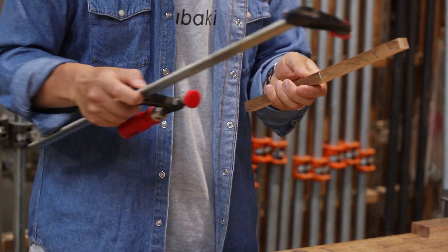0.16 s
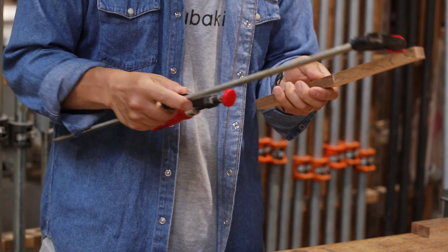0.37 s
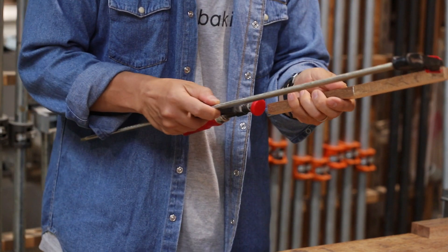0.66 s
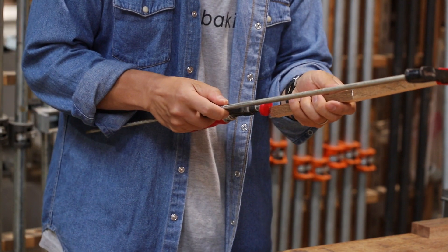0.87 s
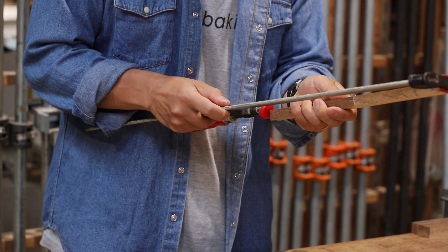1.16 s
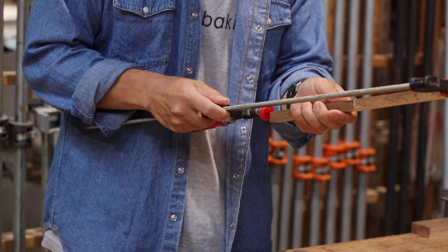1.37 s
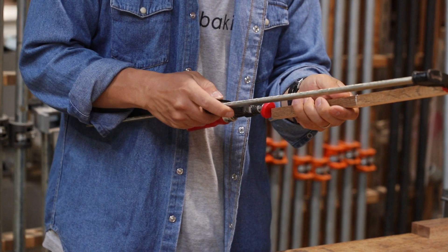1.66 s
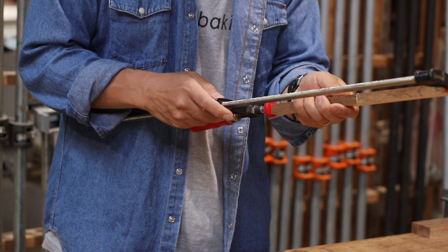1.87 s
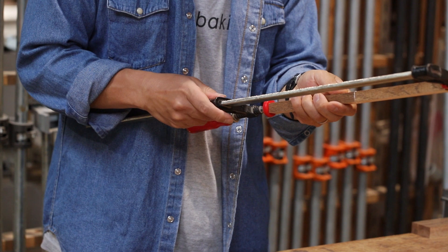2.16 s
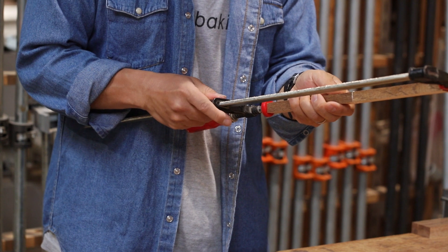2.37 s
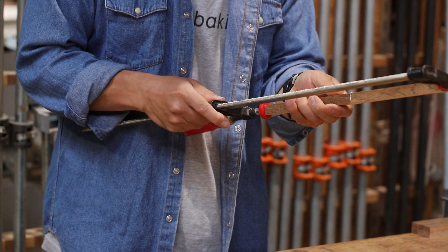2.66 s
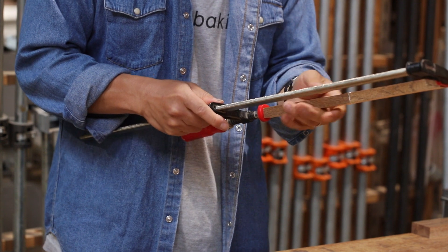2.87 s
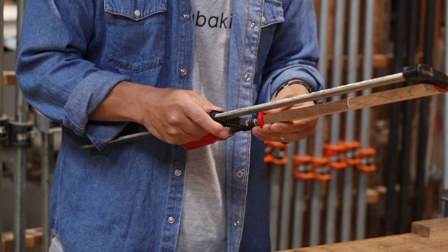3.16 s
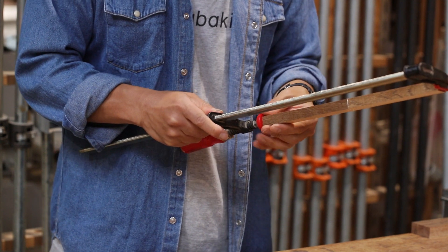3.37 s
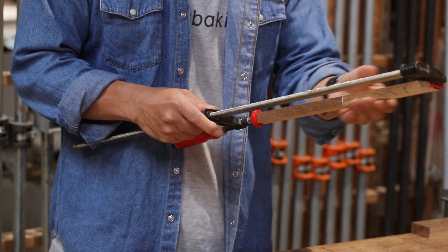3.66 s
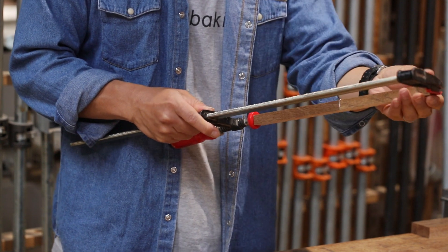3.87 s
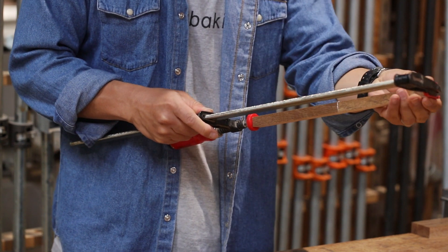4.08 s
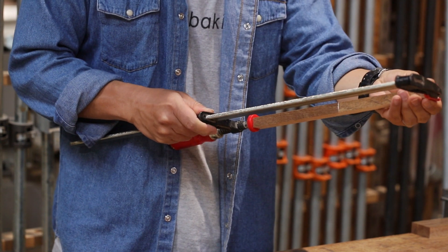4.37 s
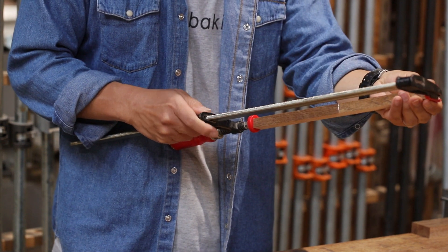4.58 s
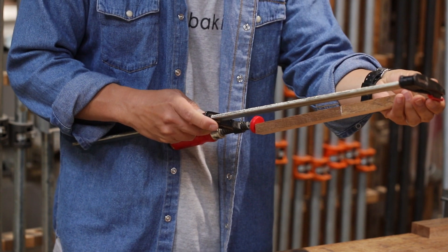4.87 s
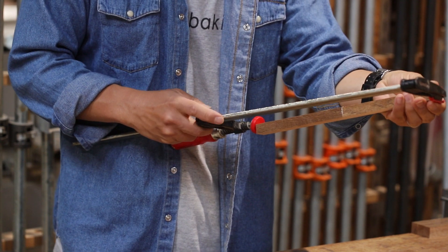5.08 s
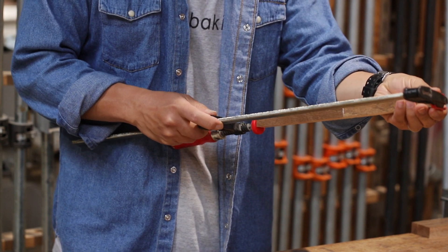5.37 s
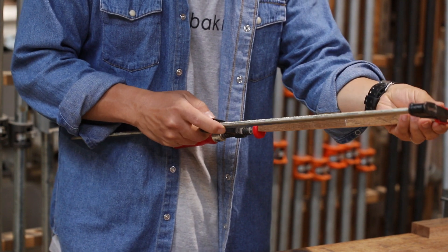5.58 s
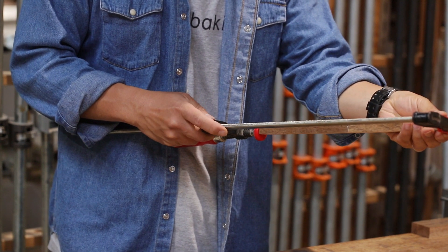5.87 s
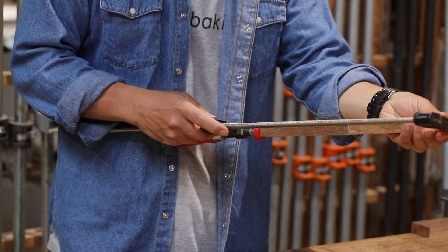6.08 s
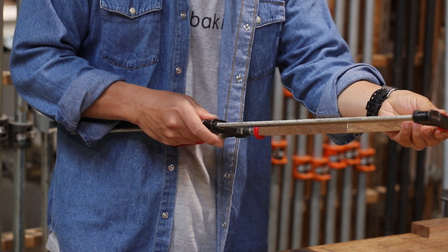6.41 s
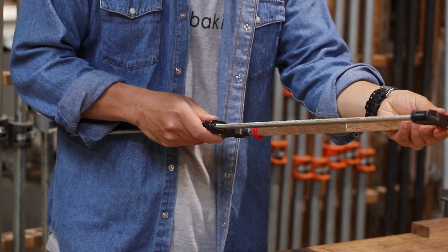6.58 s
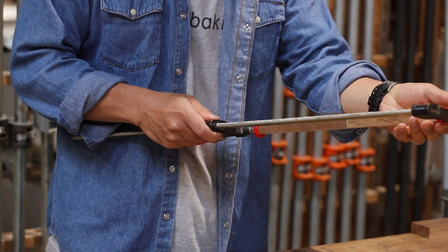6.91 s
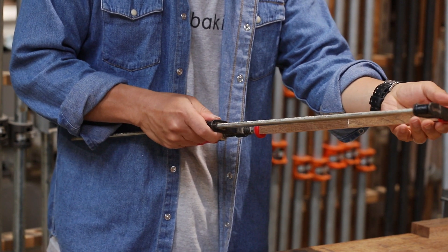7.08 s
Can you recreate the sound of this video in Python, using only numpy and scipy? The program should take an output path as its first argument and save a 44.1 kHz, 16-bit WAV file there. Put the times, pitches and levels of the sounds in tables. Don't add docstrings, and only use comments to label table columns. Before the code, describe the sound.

A bar clamp clicks and rattles sharply close by in a quiet workshop, then a distant hammer knocks steadily on wood, echoing round a corner.

```python
import sys
import numpy as np
from scipy import signal
from scipy.fft import rfft, irfft, next_fast_len
from scipy.io import wavfile

SR = 44100
rng = np.random.default_rng(int(sys.argv[2]) if len(sys.argv) > 2 else 0)


def log_audio(samples):
    frames = np.atleast_2d(samples).T
    limited = np.clip(frames, -1, 1)
    pcm = np.round(limited * 32767).astype(np.int16)
    wavfile.write(sys.argv[1], SR, pcm)


def makeup_ratio(level_db):
    decades = np.asarray(level_db, float) / 20
    return 10 ** decades


N = 319725
TAIL = SR

# (frequency [Hz], decay time t60 [s], build-up time [s])
SHOP = [(100, 0.79, 0.0029), (400, 0.73, 0.0032), (1400, 0.72, 0.0086), (4100, 0.61, .014),
        (7800, 0.43, 0.01), (14000, 0.34, 0.0078)]


def unit(x):
    return x / np.sqrt(np.mean(x ** 2) + 1e-20)


def early(x):
    return x / np.sqrt(np.mean(x[:SR // 10] ** 2))


def along(points, hz, column=1):
    table = np.transpose(points)
    return np.interp(np.log(hz + 1), np.log(table[0] + 1), table[column])


def coloured(x, gain):
    m = 2 * next_fast_len(len(x))
    cepstrum = irfft(np.log(gain(np.fft.rfftfreq(m, 1 / SR)) + 1e-6), m)
    cepstrum[1:m // 2] *= 2
    cepstrum[m // 2 + 1:] = 0
    response = np.exp(rfft(cepstrum))
    return irfft(rfft(x, m) * response, m)[:len(x)]


def shaped(x, envelope):
    hz, t, z = signal.stft(x, SR, nperseg=256)
    weighted = z * envelope(hz[:, None], t)
    return signal.istft(weighted, SR, nperseg=256)[1][:len(x)]


def add(track, s, sound):
    start = round(s * SR)
    sound = sound[max(-start, 0):N - start]
    track[max(start, 0):][:len(sound)] += sound


def dying(hz, t):
    return makeup_ratio(-60 * t / along(SHOP, hz))


def noise(spectrum, db):
    return makeup_ratio(db) * unit(coloured(rng.standard_normal(N), lambda hz: makeup_ratio(along(spectrum, hz))))


def machine():
    # (time [s], frequency [Hz], level [dB])
    hum_course = [(0.0, 214.7, -76), (0.11, 205.7, -77), (0.3, 208.5, -86), (0.32, 209, -73),
                  (0.38, 209, -74), (0.41, 209, -70), (0.45, 207.7, -67.5), (0.64, 208.1, -74),
                  (0.66, 209, -77), (0.68, 207, -71), (0.85, 208.0, -69), (1.24, 205.7, -74.5),
                  (1.25, 207, -86), (1.28, 205.2, -81), (1.58, 207.4, -65.5), (1.76, 208.4, -66),
                  (1.87, 211.5, -90), (1.93, 209, -69.5), (2.16, 206.7, -76), (2.23, 206.4, -83),
                  (2.28, 208.1, -73), (2.47, 206.6, -86), (2.48, 207.0, -88), (2.6, 195.8, -79)]
    # (centre [Hz], width [Hz], level [dB])
    low_drone = (72, 9, -86)
    s, hz, db = np.transpose(hum_course)
    t = np.arange(N) / SR
    level = np.interp(t, s, db, right=-120)
    phase = 2 * np.pi * np.cumsum(np.interp(t, s, hz)) / SR
    hum = np.sqrt(2) * makeup_ratio(level) * np.sin(phase)
    centre_hz, width_hz, drone_db = low_drone
    resonance = lambda f: 1 / (1 + (2 * (f - centre_hz) / width_hz) ** 2)
    return hum + makeup_ratio(drone_db) * unit(coloured(rng.standard_normal(N), resonance))


def air():
    # (frequency [Hz], level [dB per Hz])
    air_spectrum = [(12, -72), (20, -45.5), (70, -15), (172, -19.5), (210, -10.5), (319, -25), (422, -17),
                    (513, -28.5), (607, -24), (698, -30), (759, -25), (2460, -34.5), (16000, -40)]
    return noise(air_spectrum, -70)


def hiss():
    # (frequency [Hz], level [dB per Hz])
    hiss_spectrum = [(12, -20), (20, 1.5), (60, -7.5), (98, -1.5), (216, -11), (738, -10.5), (6910, -9),
                     (16000, -10)]
    return noise(hiss_spectrum, -77)


def timber():
    # (time [s], level [dB], build-up time [s], spectral tilt [dB per octave])
    knocks = [
        (-.09, -68, 0.028, 0),
        (2.612, -50.5, 0.028, 0.5),
        (2.74, -56.5, .03, 1.5),
        (3.42, -50, 0.026, 1),
        (4.8, -52, 0.038, 1),
    ]
    # (frequency [Hz], level [dB per Hz])
    plank = [(35, -60), (60, -20.5), (124, -20), (458, 2), (515, -6), (882, -5.5), (968, -5), (1280, -7),
             (6740, -18.5), (16000, -37.5)]
    track = np.zeros(N)
    for s, db, build, tilt_db in knocks:
        swell = lambda hz, t: dying(hz, 0.82 * t) * (1 - np.exp(-t / max(build, .002))) ** 2
        tone = lambda hz: makeup_ratio(along(plank, hz) + tilt_db * np.log2(hz / 1000 + .1))
        echoes = shaped(rng.standard_normal(TAIL), swell)
        add(track, s, makeup_ratio(db + 2.5) * early(coloured(echoes, tone)))
    return track


def clamp():
    # (time [s], peak level [dB], centre [Hz], rattle t60 [s], bar ring [dB], wood knock [dB])
    contacts = [(0.5048, -46.5, 1670, 0.019, -3, -10.5), (0.5106, -34.5, 2600, 0.02, -13, -14),
                (0.5156, -41, 2750, 0.016, -18, -18), (0.5188, -35, 3760, 0.021, -21, -19.5),
                (0.5237, -39, 1820, 0.02, -28, -30), (0.5284, -53, 3800, 0.02, -21, -26),
                (0.5547, -63.5, 2690, 0.02, 4, -25), (0.5974, -60, 2720, 0.019, -17, -18),
                (0.602, -40, 2630, 0.022, -14, -16), (0.6129, -41.5, 5750, 0.024, -24, -17),
                (0.6629, -53, 1870, 0.02, -11, -9), (0.8794, -63, 1960, 0.019, -16, -9),
                (0.9304, -52.5, 2820, 0.019, -16, -17), (0.9659, -50.5, 5900, 0.02, -24, -14),
                (1.1248, -55, 1610, 0.02, -14, -7), (1.1647, -59, 1600, 0.02, -13, -9),
                (1.2196, -58, 1610, 0.02, -10, -4), (1.2497, -59.5, 1620, 0.02, -14, -14),
                (1.8404, -39.5, 3940, 0.021, -20, -14.5), (1.8427, -39.5, 1980, 0.024, -15, -18),
                (1.8534, -52, 3920, 0.02, -32, -7.5), (1.8806, -45.5, 3270, 0.027, -15, -11.5),
                (2.0863, -40.5, 4600, 0.02, -15.5, -13.5), (2.1027, -40, 3710, 0.02, -25.5, -14.5),
                (2.1029, -43, 5370, 0.02, -22, -10), (2.1059, -39, 5700, 0.023, -23.5, -23.5),
                (2.1124, -55, 4160, 0.02, -28, -13), (2.3469, -56.5, 1760, 0.02, -15, -3),
                (4.8893, -35, 1950, 0.016, -12, -15)]
    # (frequency [Hz], level [dB], decay time t60 [s])
    bar_modes = [(1802, 1, 0.094), (2726, -6.5, 0.27), (3250, -7, 0.22), (3940, -6.5, 0.2),
                 (4150, -5.5, 0.3), (4600, -17.5, .2), (5310, -11.5, 0.26), (5540, -8.5, 0.27),
                 (6130, -8.5, 0.25), (7800, 6, 0.063), (12400, 11.5, 0.042)]
    # (frequency [Hz], decay time t60 [s])
    stick = (640, 0.056)
    stick_hz, stick_t60 = stick
    track = np.zeros(N)
    t = np.arange(SR // 2) / SR
    onset = 1 - np.exp(-t / 0.00039)
    for s, db, centre_hz, t60, ring_db, knock_db in contacts:
        peak = lambda hz: 1 / (1 + (1.5 * (hz / centre_hz - centre_hz / (hz + 1))) ** 2)
        band = lambda hz: .16 * hz / (hz + 900) + peak(hz)
        rattle = unit(coloured(rng.standard_normal(len(t)), band)) * makeup_ratio(-60 * t / max(t60, .003))
        ring = np.zeros(len(t))
        for hz, level, life in bar_modes:
            decay = makeup_ratio(level + rng.normal(0, 2.9) - 60 * t / life)
            ring += band(hz) * decay * np.sin(2 * np.pi * hz * t)
        knock = makeup_ratio(knock_db - 60 * t / stick_t60) * np.sin(2 * np.pi * stick_hz * t)
        contact = rattle + makeup_ratio(ring_db) * ring + knock
        add(track, s - .0006, makeup_ratio(db - 4.0) * contact * onset)
    tail = shaped(rng.standard_normal(TAIL), lambda hz, t: dying(hz, 1.48 * t) * (t > .003))
    return track + makeup_ratio(-10) * signal.fftconvolve(track, tail / np.linalg.norm(tail))[:N]


def hammer():
    # (time [s], level [dB], relative thud [dB], relative crack [dB], relative sizzle [dB]), see part_hz
    blows = [(3.0522, -61.0, 9.3, -0.5, -7.9), (3.306, -50.5, 0.74, -6, -11.5),
             (3.5569, -49.5, 0.91, -3.8, -9), (3.794, -49.5, 1.2, -4, -7.6), (4.03, -49.5, 3.3, -3, -8),
             (4.371, -48.1, 4.7, -3.5, -8.5), (4.6766, -44.5, 1.2, -6, -8), (4.9308, -46.5, 3, -4.5, -9),
             (5.1655, -50, 4.8, -2.5, -8), (5.413, -48.5, 3.5, -2.7, -7), (5.656, -46, 1.5, -1, -8.8),
             (5.8907, -48.5, 3.3, -1.6, -8), (6.1124, -47, 1.4, -2.5, -10.5), (6.338, -48, 1.8, -1.5, -8.5),
             (6.552, -51.5, 4.6, 3.5, -6)]
    part_hz = [300, 1300, 4000, 10000]
    # (frequency [Hz], level [dB per Hz])
    blow_spectrum = [(29, -72), (50, -44.5), (125, -7.5), (167, -9), (246, 1), (362, -4), (418, -4),
                     (783, -11.5), (842, -11.5), (1150, -8), (2210, -15), (6090, -15), (9410, -22.5),
                     (16000, -34.5)]
    # (delay [s], level [dB])
    wall_echoes = [(.004, 2.5), (.0085, -5), (.018, -3), (0.0252, -9), (0.034, -7), (.040, 8),
                   (0.045, -7.5), (.057, -16), (.068, 2), (.081, -11), (.092, -13.5), (0.1208, -15.5),
                   (.147, -13.5)]
    # (frequency [Hz], share [0-1])
    repeated = [(300, 0.97), (1200, 0.78), (4000, 0.44), (9000, 0.03)]
    # (delay [s], spread [s], level [dB])
    doorway = (0.029, .007, 3.9)
    delay, spread, door_db = doorway
    build_up = lambda hz, t: (1 - np.exp(-t / along(SHOP, hz, column=2))) ** 2
    arrive = lambda hz, t: dying(hz, t) * build_up(hz, t)
    bright = lambda hz, t: makeup_ratio(door_db * hz / (hz + 4000) * np.exp(-((t - delay) / spread) ** 2))
    share = lambda hz: np.clip(along(repeated, hz), 0, 1)
    scattered = lambda hz, t: arrive(hz, t) * bright(hz, t) * np.sqrt(1 - share(hz))
    walls = np.zeros(TAIL)
    for s, db in wall_echoes:
        add(walls, s, makeup_ratio(np.array([db + 19.5])))
    path = shaped(rng.standard_normal(TAIL), arrive)
    path += coloured(walls, lambda hz: 1 / (1 + (hz / 1500) ** 2))
    path = shaped(path, lambda hz, t: np.sqrt(share(hz)) + 0 * t)
    usual = np.mean(blows, axis=0)[2:]
    track = np.zeros(N)
    for s, db, *parts in blows:
        fresh = shaped(rng.standard_normal(TAIL), scattered)
        thud, crack, sizzle = parts - usual
        tone = list(zip(part_hz, [thud, 0, crack, sizzle]))
        sound = early(coloured(path + fresh, lambda hz: makeup_ratio(along(blow_spectrum, hz))))
        add(track, s, makeup_ratio(db + 5.5) * coloured(sound, lambda hz: makeup_ratio(along(tone, hz))))
    return track


def scene():
    mid = machine() + air() + timber() + clamp() + hammer()
    side = hiss()
    return np.array([mid + side, mid - side])


def low_pass(x):
    return signal.sosfilt(signal.butter(12, 16350, fs=SR, output="sos"), x)


def record(dry):
    return low_pass(dry)


dry = scene()
out = record(dry)
log_audio(out)
```